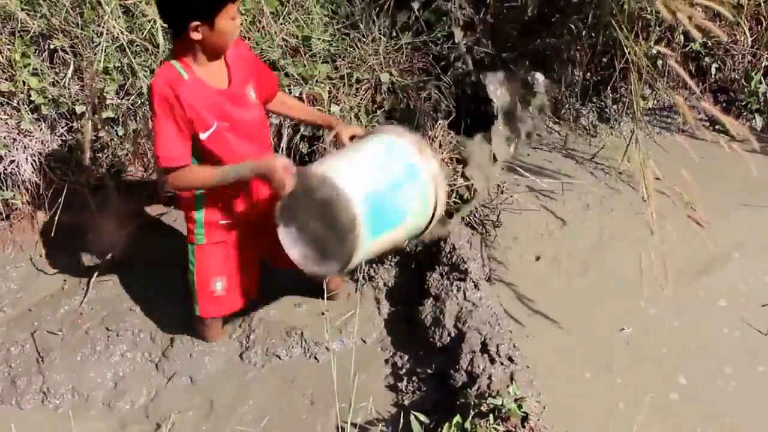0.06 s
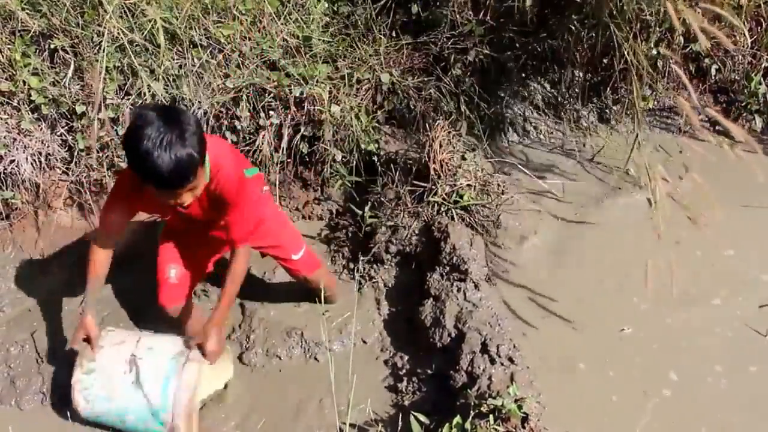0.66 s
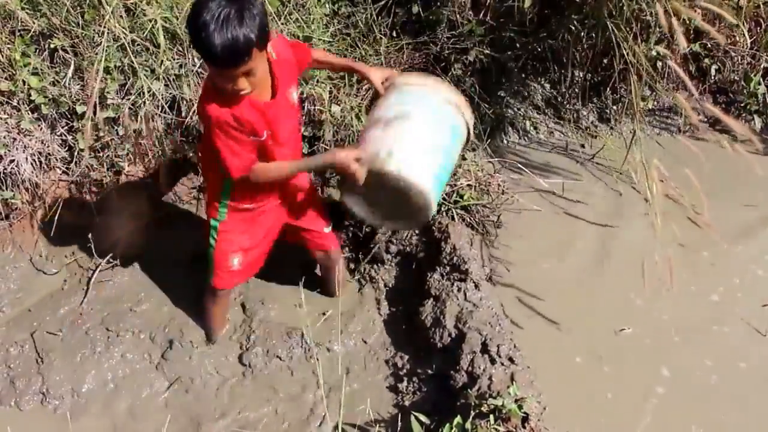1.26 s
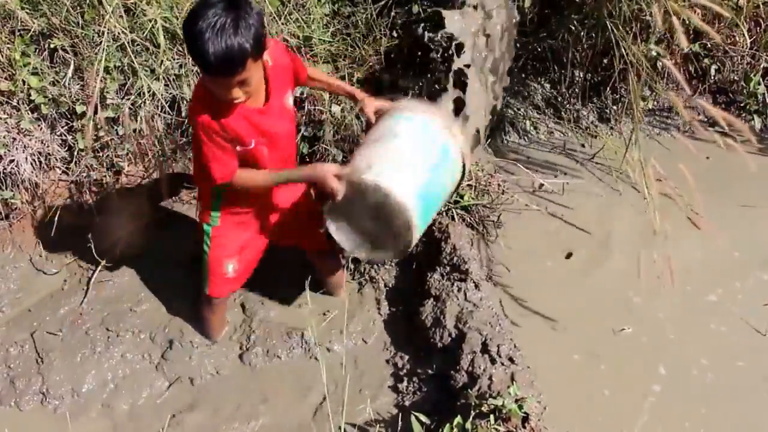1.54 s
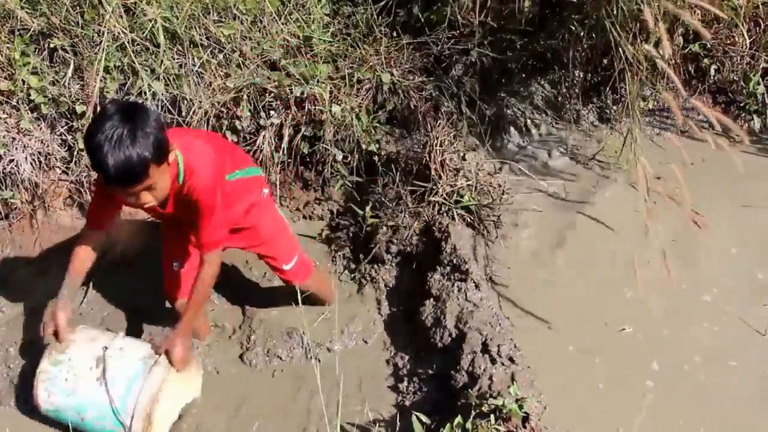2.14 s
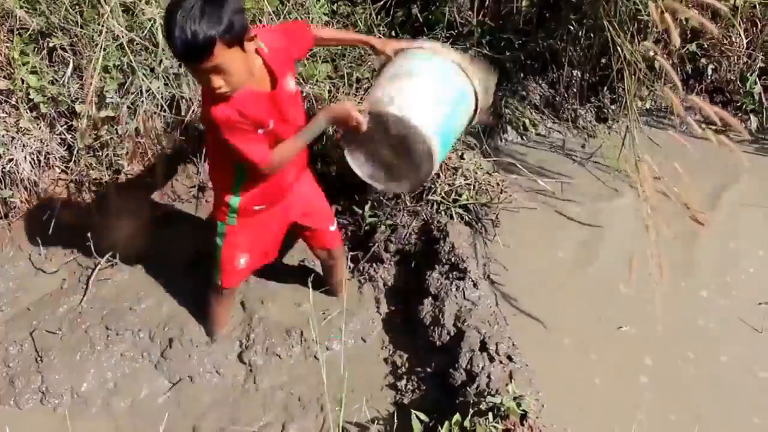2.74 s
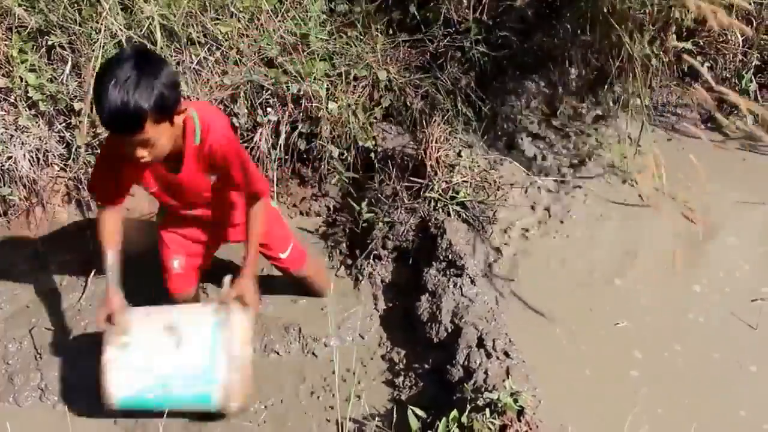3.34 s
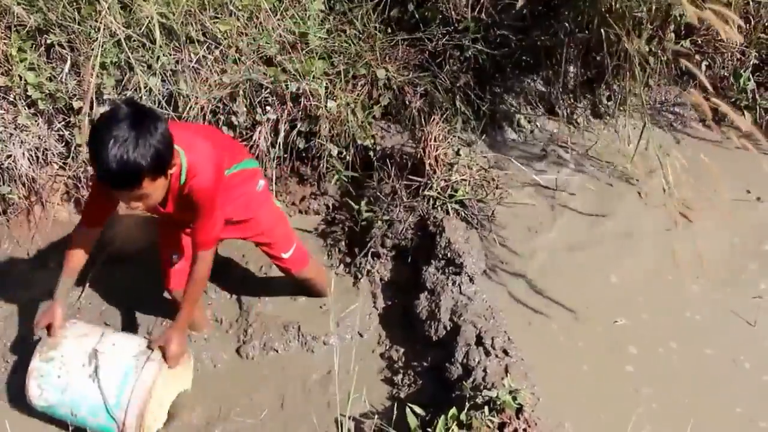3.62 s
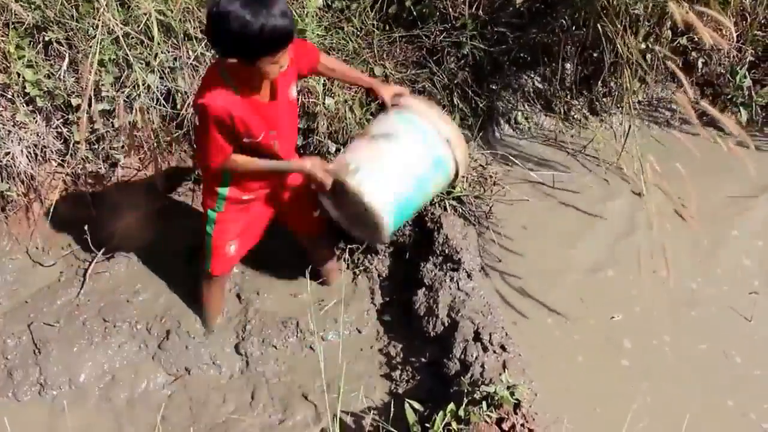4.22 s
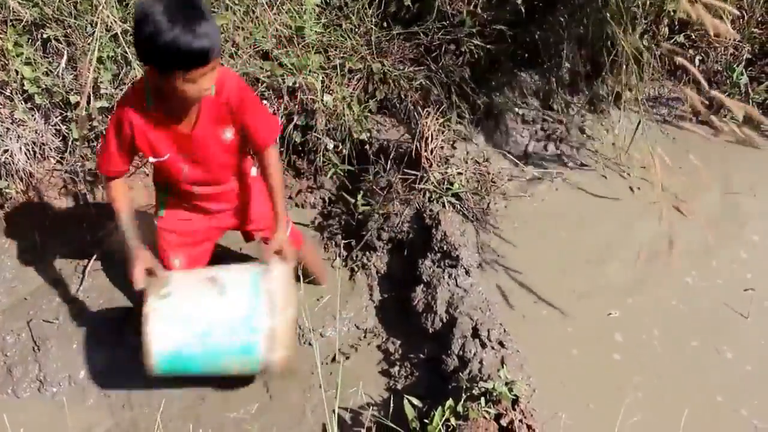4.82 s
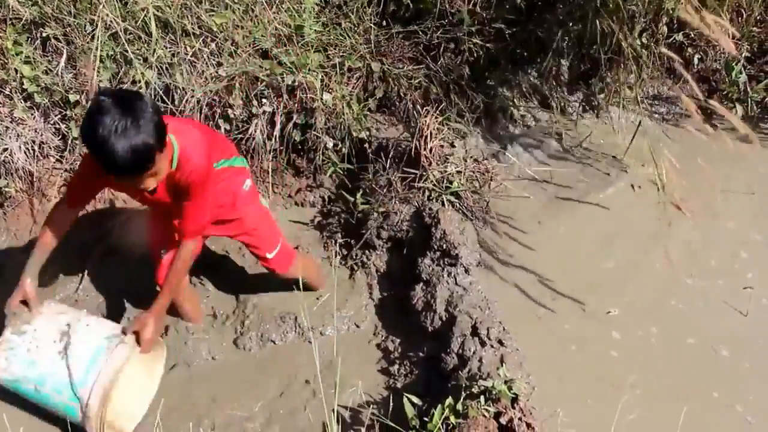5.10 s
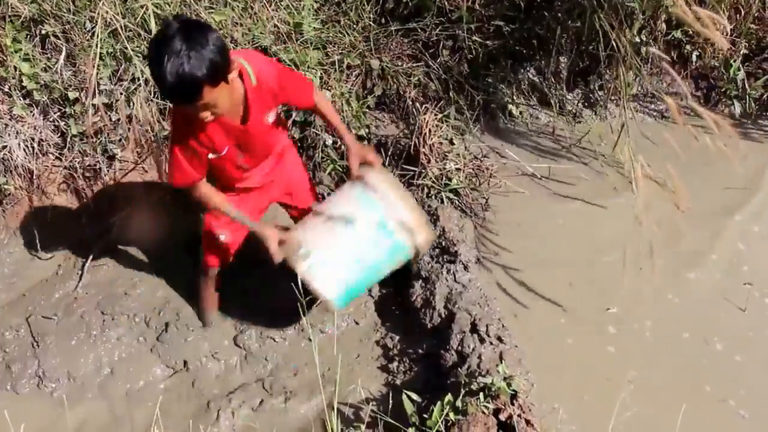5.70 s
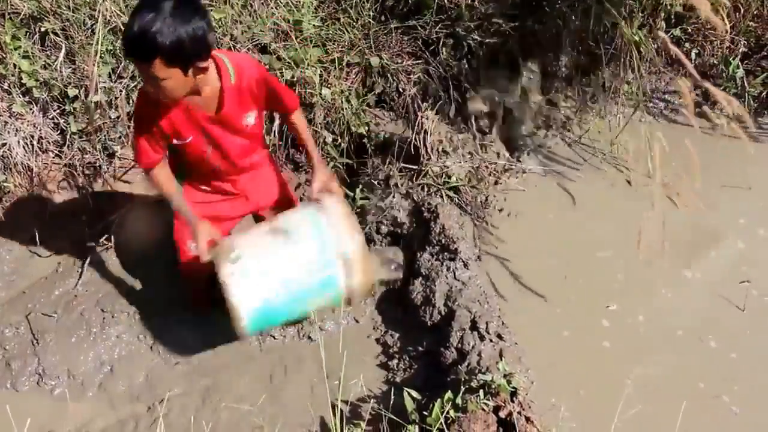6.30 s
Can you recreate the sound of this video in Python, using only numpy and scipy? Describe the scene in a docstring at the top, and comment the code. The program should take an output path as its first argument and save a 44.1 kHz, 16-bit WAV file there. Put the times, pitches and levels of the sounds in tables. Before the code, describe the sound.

A plastic bucket bails muddy water from a ditch in a steady rhythm. It hits the surface with a hollow slap, gulps full and sloshes as it is lifted, then the thrown water lands in a pool with a splash and pattering spray. Five splashes come about a second and a half apart, with lapping and drips between. The work sits slightly left, outdoors, and light wind rumbles on the microphone.

```python
"""A plastic bucket bails a muddy ditch, five throws in a row: its wall slaps the water, it gulps itself
full and churns on the upswing, and the flung sheet lands in a pool beyond a grassy bank as splash,
spray and a low plunge. The water is showers of tiny impacts and ringing air bubbles; the bucket is
a damped wall around a ringing hollow. Stirred water laps and drips between the throws, mud spatters,
and a light wind buffets the microphone."""
import sys
import numpy as np
from scipy import signal
from scipy.fft import rfft, irfft, next_fast_len
from scipy.io import wavfile
from scipy.ndimage import uniform_filter1d, map_coordinates

SR = 44100
rng = np.random.default_rng(int(sys.argv[2]) if len(sys.argv) > 2 else 0)


def put_to_file(sound):
    """Save the sound as 16-bit audio at rate SR, in the file named by the first command-line argument."""
    columns = np.atleast_2d(sound).T  # one column per channel
    safe = np.clip(columns, -1, 1)
    whole_steps = np.round(safe * 32767)
    wavfile.write(sys.argv[1], SR, whole_steps.astype(np.int16))


N = 288899

# upswings of the full bucket: centre_s, lap_db, trickle_db, churn_db, half_width_s
UPSWINGS = [(1.356, -45.5, -51, -50, 0.22), (2.85, -44, -47, -45.5, 0.12), (4.36, -45, -58, -43.5, 0.24),
            (5.977, -43.5, -55, -51, 0.4)]
# EQ of smacked water and of fine spray: freq_hz, gain_db
SMACK_EQ = [(71, -15), (120, -7), (474, 2.5), (887, -7.5), (1500, -2), (1660, -2), (2540, -7), (2800, -2.5),
            (3570, -12.5), (9810, -30.5), (15000, -74)]
SPRAY_EQ = [(2500, -1), (4200, 3), (6500, -2), (9000, -3.5), (12000, -11.5), (15000, -22)]
# stereo images, one wide in the treble and one narrow: freq_hz, coherence
WIDE = [(200, 1), (600, 0.75), (1500, 0.72), (4000, 0.36), (12000, 0.077)]
NARROW = [(290, .75), (640, 0.98), (1400, 0.95), (3100, 0.85), (7000, 0.73), (15000, 1)]


def bucket_slaps():
    """The wall smacks the surface; water damps the plastic at once, and only the hollow rings on."""
    # start_s, slap_db, thud_db, contact_s, skim_db
    hits = [(0.663, -14, -21.5, 0.023, -44.5), (2.184, -18, -32, .02, -48),
            (3.702, -15.5, -22.5, 0.02, -55), (5.229, -15, -16, 0.021, -31.5)]
    # modes of the hollow's air and floor: pitch_hz, level_db, t60_s
    modes = [(108, -24, .14), (196, 1, .14), (440, -10, .1)]
    out, t = np.zeros((2, N)), np.arange(SR // 4) / SR
    air_push = np.exp(-((t - .0025) / .00008) ** 2)  # the trapped air cushion collapses
    hollow = sum(amp(db - 60 * t / t60) * np.sin(2 * np.pi * hz * t) for hz, db, t60 in modes)
    hollow *= fade_in(t, 0.02)
    for start_s, slap_db, thud_db, contact_s, skim_db in hits:
        skim = stereo(noise_pair(SR // 40), SMACK_EQ, WIDE)
        add(out, start_s - .018, amp(skim_db) * skim)  # the rim grazes the water first
        contact = fade_in(t, .0013) * (np.exp(-(t / contact_s) ** 2) + 0.057 * np.exp(-t / 0.018))
        smack = contact * stereo(noise_pair(len(t)), SMACK_EQ, WIDE)
        force = contact * rng.standard_normal(len(t)) + 5 * air_push
        plastic = unit(filtered(force, bucket_wall)) * np.std(contact)
        add(out, start_s, amp(slap_db) * (amp(-6) * smack + amp(-5) * plastic) + amp(thud_db) * hollow)
    return pan(4.5) * out


def bucket_wall(hz):
    """Response of the wet plastic: damped resonances of alternating polarity."""
    # pitch_hz, bandwidth_hz, level_db
    modes = [(315, 390, -13.5), (438, 59, 3), (1027, 61, -2.5), (1352, 53, 5.5), (1704, 42, 6.5),
             (1980, 125, 0.5), (2145, 45, 2), (2690, 61, 1.5), (4000, 141.5, -24)]
    return sum((-1) ** k * amp(db) * 1j * hz * width / (pitch ** 2 - hz ** 2 + 1j * hz * width)
               for k, (pitch, width, db) in enumerate(modes))


def bucket_churn():
    """The load churns on each upswing; on the last, water sliding over the rim makes the wall sing."""
    # freq_hz, gain_db
    churn_eq = [(150, -18), (330, 5.5), (700, -9), (1200, 0.5), (2200, -12), (5000, -35)]
    rim_s, rim_hz = 6.0, 1700
    swing = sum(amp(churn_db) * hump(centre_s, half_s) for centre_s, _, _, churn_db, half_s in UPSWINGS)
    churn = stereo(patchy(noise_pair(N), depth_db=7.5), churn_eq, WIDE)
    ring = filtered(rng.standard_normal(N), lambda hz: 1 / (1 + ((hz - rim_hz) / 22) ** 2))
    sliding = amp(-49) * swell(np.arange(N) / SR - rim_s, attack_s=0.022, hold_s=.02, release_s=0.11)
    return pan(3) * (swing * churn + sliding * unit(ring))


def bucket_knock():
    """The stiff plastic gives one dry click as the bucket is tipped out."""
    # freq_hz, gain_db
    click_eq = [(800, -20), (3000, 7), (9000, -3), (15000, -8)]
    start_s, decay_s = 2.933, 0.0016
    out, t = np.zeros((2, N)), np.arange(SR // 40) / SR
    click = stereo(noise_pair(len(t)), click_eq, NARROW) * np.exp(-t / decay_s)
    add(out, start_s, amp(-24) * click)
    return out


def flung_water():
    """The sheet breaks into lumps that plunge and trap air, and spray that patters on grass and pool."""
    # freq_hz, gain_db
    splash_eq = [(300, -26.5), (600, -23), (1000, -4), (1500, -1), (2200, -7.5), (2750, 0), (3500, -12),
                 (4150, -5), (4900, -14), (6500, -13), (10000, -25), (15000, -52)]
    plunge_eq = [(120, -32), (280, -20.5), (450, -3), (700, -21), (1100, -16), (2500, -47)]
    splash_gain, spray_gain, plunge_gain = landing_envelopes()
    lumps = unit(amp(1.9 * wobble(130)))
    coarse_drops = patchy(drops(rate=900, spread_db=7, hiss_db=5.5), depth_db=1.5)
    splash = lumps * stereo(coarse_drops, splash_eq, NARROW)
    froth = bubbles(rate=530, lo_hz=820, hi_hz=3010, cycles=6.7, spread_db=12.5)
    fine_drops = patchy(drops(rate=2000, spread_db=1.5, hiss_db=-2.5), depth_db=2.5)
    spray = stereo(fine_drops, SPRAY_EQ, NARROW)
    thuds = drops(rate=400, spread_db=3, hiss_db=-6)
    plunge = unit(amp(5.4 * wobble(70))) * stereo(thuds, plunge_eq, NARROW)
    body = splash_gain * (amp(-1.5) * splash + amp(-8) * froth) + plunge_gain * amp(-1) * plunge
    return pan(3.1) * body + pan(1) * spray_gain * amp(-4.5) * spray


def landing_envelopes():
    """Splash, spray and plunge gains: spray lands first, the sheet pours down, its bulk plunges last."""
    # start_s, splash_db, spray_db, plunge_db, first_lump_db, spray_lead_s, attack_s, pour_s
    throws = [(0.166, -27.5, -31, -32.5, -48, 0.033, 0.023, 0.1),
              (1.83, -27, -30.5, -40.5, -50, 0.0018, 0.03, 0.091),
              (3.268, -28, -29, -30.5, -54, 0.011, 0.015, 0.1),
              (4.738, -29, -29, -36.5, -34.5, 0.0047, 0.0085, 0.1),
              (6.353, -28.5, -29.5, -30, -32.5, 0.015, 0.021, 0.11)]
    splash, spray, plunge = np.zeros((3, N))
    for start_s, splash_db, spray_db, plunge_db, lump_db, lead_s, attack_s, pour_s in throws:
        t = np.arange(N) / SR - start_s
        rebound = hump(start_s + 0.21, half_s=0.08)
        splash += amp(splash_db) * swell(t, attack_s, pour_s, release_s=0.022) + amp(-43) * rebound
        shower = swell(t + lead_s, 1.08 * attack_s, pour_s + lead_s, release_s=0.036)
        # stray drops fly ahead of the sheet and run off the grass after it
        strays = amp(-8.5) * swell(t + lead_s, attack_s=0.13, hold_s=pour_s + lead_s, release_s=0.15)
        spray += amp(spray_db) * np.hypot(shower, strays)
        lump = amp(lump_db) * swell(t, attack_s=.006, hold_s=.015, release_s=0.038)
        bulk = amp(plunge_db) * swell(t - pour_s + 0.012, attack_s=0.035, hold_s=0, release_s=0.027)
        plunge += lump + bulk + amp(-50) * rebound
    return splash, spray, plunge


def slops():
    """Water slops on rim, legs or pool: a wet puff and four bubbles near the pitch of its air pocket."""
    # start_s, level_db, pitch_hz, length_s
    lumps = [(0.229, -18, 970, 0.04), (0.537, -27.5, 2700, 0.038), (0.578, -17, 1210, 0.017),
             (0.601, -20, 1840, 0.015), (0.868, -32.5, 650, 0.034), (0.938, -26.5, 1180, 0.025),
             (0.999, -30, 1570, 0.022), (1.129, -34.5, 1796, 0.02), (1.791, -24, 2490, 0.012),
             (2.112, -22, 940, 0.019), (2.137, -20, 1320, 0.021), (2.615, -23, 2600, 0.01),
             (2.939, -15, 1210, 0.016), (3.588, -22, 2760, 0.014), (3.616, -21.5, 1520, 0.017),
             (3.963, -25, 1570, 0.021), (4.097, -24.5, 1320, 0.036), (4.73, -22, 2720, 0.016),
             (5.369, -26, 1330, 0.039), (5.566, -26.5, 930, 0.021), (5.669, -26, 1140, 0.014),
             (6.325, -18, 1920, 0.011), (6.356, -10.5, 1460, 0.016)]
    out, t = np.zeros((2, N)), np.arange(SR // 6) / SR
    for start_s, db, pitch_hz, length_s in lumps:
        pocket = lambda hz: amp(-9.5) + 1 / (1 + (np.log2((hz + 1) / pitch_hz) / 0.3) ** 2)
        puff = stereo(filtered(noise_pair(len(t)), pocket), SMACK_EQ, WIDE)
        add(out, start_s, amp(db - 10) * puff * fade_in(t, 0.00087) * np.exp(-(t / length_s) ** 2))
        for late, octave in zip(np.linspace(0, 1, 4), rng.uniform(-.4, .4, 4)):
            pop = bubble(t, pitch_hz * 2 ** octave, cycles=4.5, rise=.06)
            add(out, start_s + length_s * late * rng.uniform(.8, 1.6), amp(db - 9 - 7 * late) * pop)
    return pan(5.2) * out


def gulps():
    """Large pockets of air close with a short plop."""
    # start_s, level_db, pitch_hz, decay_cycles
    pockets = [(0.167, -15.5, 1590, 4.6), (0.667, -15, 343, 2.5), (0.872, -27, 510, 2.5),
               (2.186, -16.5, 433.5, 3.2), (3.588, -22.5, 266, 1.85), (4.742, -10, 2400, 2.1),
               (5.171, -18, 704, 1.5), (5.232, -20, 471, 6.5), (5.274, -18.5, 825, 2.6)]
    out, t = np.zeros(N), np.arange(SR // 10) / SR
    for start_s, db, pitch_hz, cycles in pockets:
        add(out, start_s, amp(db) * bubble(t, pitch_hz, cycles, rise=0.061))
    return pan(6.2) * out


def stirred_water():
    """Thick water laps in clumps of bubbles and single drips, while a trickle runs off the bucket."""
    # freq_hz, gain_db
    wash_eq = [(120, -4.5), (200, 0), (298, -2.5), (338, -1.5), (560, -7.5), (896, 0), (2380, -3),
               (2650, -0.5), (3410, -5.5), (8720, -21), (15000, -39.5)]
    lap_gain, trickle_gain = stirring_envelopes()
    clumps = amp(1.5 * wobble(35))
    wash = stereo(patchy(drops(rate=700, spread_db=-1.5, hiss_db=5), depth_db=4), wash_eq, WIDE)
    gurgle = bubbles(rate=220, lo_hz=398, hi_hz=2166, cycles=3.1, spread_db=4, samples=1024)
    drips = bubbles(rate=22, lo_hz=700, hi_hz=3200, cycles=5, spread_db=3, samples=1536)
    lapping = lap_gain * clumps * (amp(-3) * wash + amp(-10) * gurgle + amp(-15) * drips)
    trickle = trickle_gain * stereo(drops(rate=140, spread_db=5, hiss_db=6), SPRAY_EQ, NARROW)
    return pan(5.05) * lapping + pan(0.37) * amp(-4) * trickle


def stirring_envelopes():
    """Lap and trickle gains: each scoop and each swing stirs the ditch, which then settles."""
    # the bucket is pushed in and dragged full: centre_s, lap_db, trickle_db, half_width_s
    scoops = [(0.53, -51, -48.5, 0.15), (0.894, -53, -77, 0.11), (2.124, -56, -55, 0.21),
              (2.522, -45.5, -60, 0.14), (3.597, -50, -47.5, 0.087), (3.821, -47, -53.5, 0.041),
              (3.955, -50.5, -56, 0.073), (4.103, -37, -50, 0.026), (5.394, -51.5, -66, 0.27),
              (5.583, -47.5, -62, 0.042)]
    lap, trickle = np.full(N, amp(-48.5)), np.full(N, amp(-63))  # the ditch at rest
    for centre_s, lap_db, trickle_db, half_s in scoops:
        lap += amp(lap_db) * hump(centre_s, half_s)
        trickle += amp(trickle_db) * hump(centre_s, half_s)
    for centre_s, lap_db, trickle_db, _, half_s in UPSWINGS:
        lap += amp(lap_db) * hump(centre_s, 1.01 * half_s)
        trickle += amp(trickle_db) * hump(centre_s - 0.099, 1.03 * half_s)  # the run-off comes first
    return lap, trickle


def mud_spatters():
    """Flecks of wet mud land with a bright tick and a little fizz; strays follow the trickle's level."""
    # start_s, level_db
    flecks = [(0.0177, -31), (0.075, -32.5), (0.422, -38.5), (0.5388, -33.5), (1.179, -35), (1.5331, -37.5),
              (2.1141, -36), (2.6194, -35.5), (3.5924, -36), (4.332, -35), (5.568, -36)]
    # freq_hz, gain_db
    tick_eq = [(1200, -23), (3000, 7.5), (6000, 8.5), (10000, -4), (15000, -17)]
    strays_per_s = 4.6
    out, t = np.zeros((2, N)), np.arange(SR // 12) / SR
    trickle_db = 20 * np.log10(stirring_envelopes()[1])
    strays = [(i / SR, trickle_db[i] + 11) for i in rng.integers(N, size=int(strays_per_s * N / SR))]
    tick, fizz = 1.8 * np.exp(-t / .0012), 0.83 * np.exp(-t / 0.019)
    for start_s, db in flecks + strays:
        add(out, start_s, amp(db - 8) * (tick + fizz) * stereo(noise_pair(len(t)), tick_eq, WIDE))
    return pan(3.5) * out


def wind_and_thumps():
    """Wind flutters on the microphone under low thumps, left and right largely in opposite phase."""
    # time_s, level_db
    strength = [(0.0, -44.5), (0.75, -44.5), (0.95, -51.5), (1.25, -41.5), (1.7, -49.1), (2.15, -41),
                (2.45, -39), (2.8, -34), (3.0, -32), (3.35, -25), (3.52, -41), (3.85, -52), (4.3, -53),
                (5.62, -53), (5.72, -23.9), (5.98, -36.5), (6.1, -27.5), (6.55, -32.5)]
    # low thumps: wind eddies, and at 4.13 s the bucket's hollow thud as it is lifted
    # centre_s, level_db, half_width_s
    low_thumps = [(1.887, -31, 0.014), (2.137, -27.5, 0.046), (2.845, -17, 0.015), (2.896, -21, 0.015),
                  (3.595, -17, 0.0079), (4.131, -23.5, 0.036), (4.557, -40, 0.017), (6.063, -19.5, 0.016),
                  (6.467, -22, 0.03)]
    # freq_hz, gain_db
    breeze_eq = [(20, -34), (35, -11), (60, -1.5), (110, 2.5), (190, -7.5), (280, -20.5), (450, -29),
                 (900, -61)]
    thump_eq = [(25, -45), (60, 1.5), (110, 4.5), (170, 4.5), (250, -5.5), (350, -19), (700, -60.5)]
    opposed = [(30, -0.39), (130, -0.65), (350, -0.63)]  # freq_hz, coherence
    breeze_db = np.interp(np.arange(N) / SR, *np.transpose(strength)) - 1
    flutter = unit(amp(7 * np.tanh(wobble(35) / 2)))
    breeze = amp(breeze_db) * flutter * unit(stereo(noise_pair(N), breeze_eq, opposed))
    thump_gain = sum(amp(db) * hump(centre_s, half_s) for centre_s, db, half_s in low_thumps)
    thumps = thump_gain * unit(stereo(noise_pair(N), thump_eq, opposed))
    return pan(-2) * (breeze + thumps)


def bank_scatter(sound, t60_s=0.14):
    """The banks scatter the sound back as a short, diffuse tail."""
    t = np.arange(SR // 4) / SR
    tail = noise_pair(len(t)) * amp(-60 * t / t60_s) * fade_in(t, 0.025)
    return signal.fftconvolve(sound, tail / np.linalg.norm(tail[0]), axes=1)[:, :N]


def bubble(t, hz, cycles, rise):
    """An air pocket rings briefly, its pitch rising as it nears the surface."""
    age = t * hz / cycles
    phase = 2 * np.pi * hz * t * (1 + rise * np.minimum(age, 4) / 2)
    return np.sin(phase) * np.exp(-age) * fade_in(t, 0.5 / hz)


def bubbles(rate, lo_hz, hi_hz, cycles, spread_db, samples=512):
    """A cloud of rate bubbles a second, a few much louder than the rest; rms 1."""
    onset, pitch, rank, life = np.hsplit(rng.random((int(rate * N / SR), 4)), 4)
    hz = lo_hz * (hi_hz / lo_hz) ** pitch
    strength = amp(-spread_db * np.log(.04 + .96 * rank)) * np.sqrt(hz)
    rings = strength * bubble(np.arange(samples) / SR, hz, cycles * (.5 + life), rise=0.041)
    rings *= np.linspace(1, 0, samples)
    where = (onset * N).astype(int) + np.arange(samples)
    return unit(np.bincount(where.ravel(), rings.ravel(), N)[:N])


def drops(rate, spread_db, hiss_db):
    """Two unrelated showers of rate tiny impacts a second, mixed with hiss; rms 1."""
    hit = rng.random((2, N)) < rate / SR
    strength = amp(spread_db * np.minimum(rng.exponential(size=(2, N)), 3))
    polarity = rng.choice([-1, 1], (2, N))
    return unit(unit(hit * strength * polarity) + amp(hiss_db) * noise_pair(N))


def patchy(pair, depth_db):
    """Cavities open and close in the water, so narrow bands swell for a few hundredths of a second."""
    spectra = signal.stft(pair, nperseg=512)[2]
    patches = uniform_filter1d(rng.standard_normal(spectra.shape[1:]), size=5, axis=0)
    patches = unit(uniform_filter1d(patches, size=3, axis=1))
    return signal.istft(spectra * amp(depth_db * patches), nperseg=512)[1][:, :pair.shape[1]]


def stereo(pair, eq, coherence):
    """Two unrelated signals become an equalised left and right whose mid has rms 1."""
    def mid_side(hz):
        angle = np.arccos(np.clip(along(coherence, hz), -.99, .99)) / 2
        return amp(along(eq, hz)) * [np.cos(angle), np.sin(angle)]
    mid, side = filtered(pair, mid_side)
    return np.array([mid + side, mid - side]) / (np.std(mid) + 1e-12)


def swell(t, attack_s, hold_s, release_s):
    """Builds up until t = 0, holds, then dies away."""
    return np.exp(np.minimum(t, 0) / attack_s - np.maximum(t - hold_s, 0) / release_s)


def hump(centre_s, half_s):
    """A bell-shaped rise and fall."""
    return np.exp(-((np.arange(N) / SR - centre_s) / half_s) ** 2)


def fade_in(t, attack_s):
    """An exponential rise from 0 to 1."""
    return 1 - np.exp(-t / attack_s)


def wobble(rate):
    """A smooth random curve, rate knots a second."""
    return map_coordinates(rng.standard_normal(int(N * rate / SR) + 4), [np.arange(N) * rate / SR])


def noise_pair(samples):
    """Two unrelated white noises."""
    return rng.standard_normal((2, samples))


def filtered(x, response):
    """x through a complex frequency response."""
    n = x.shape[-1]
    padded = next_fast_len(n + 8192)
    return irfft(rfft(x, padded) * response(np.fft.rfftfreq(padded, 1 / SR)), padded)[..., :n]


def along(points, hz):
    """Interpolates (freq_hz, value) points on a log frequency axis."""
    freqs, values = np.transpose(points)
    return np.interp(np.log(hz + 1), np.log(freqs + 1), values)


def add(track, start_s, sound):
    """Mixes a sound into a track."""
    part = track[..., max(round(start_s * SR), 0):][..., :sound.shape[-1]]
    part += sound[..., :part.shape[-1]]


def pan(left_db):
    """Channel gains with the left louder by left_db."""
    return amp([[left_db / 2], [-left_db / 2]])


def amp(db):
    """Decibels to gain."""
    return 10 ** (np.asarray(db) / 20)


def unit(x):
    """Scales to rms 1."""
    return x / np.sqrt(np.mean(x ** 2) + 1e-20)


def scene():
    """The bailing, slightly to the left, with faint scatter from the banks, wind and low thumps."""
    work = flung_water() + stirred_water() + bucket_churn() + bucket_slaps()
    work += slops() + gulps() + mud_spatters() + bucket_knock()
    left_lead_s = 1.2e-5
    work = filtered(work, lambda hz: np.exp(1j * np.pi * hz * left_lead_s * np.array([[1], [-1]])))
    return work + amp(-17.5) * bank_scatter(work) + wind_and_thumps()


def record(dry):
    """A steep low-pass removes the very top of the treble."""
    cutoff_hz = 15600
    return filtered(dry, lambda hz: 1 / (1 + (hz / cutoff_hz) ** 120))


dry = scene()
out = record(dry)
put_to_file(out)
```